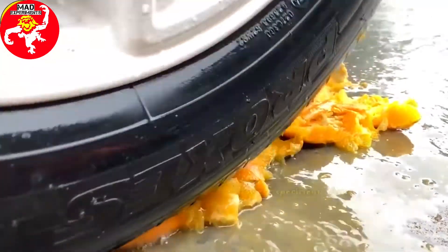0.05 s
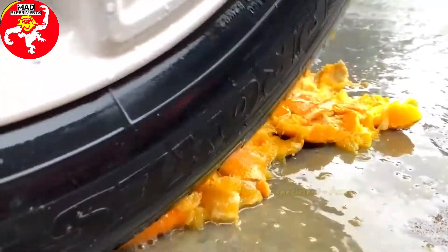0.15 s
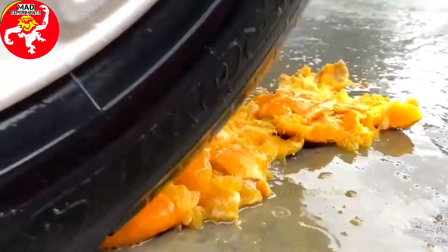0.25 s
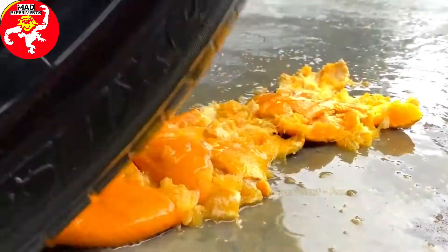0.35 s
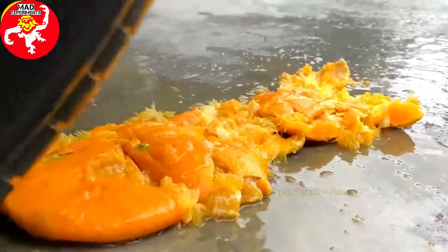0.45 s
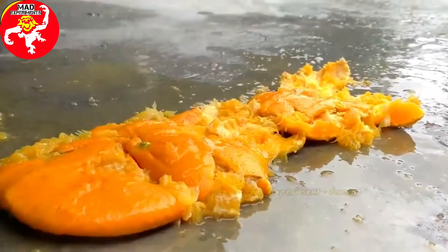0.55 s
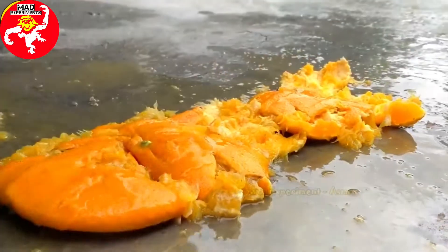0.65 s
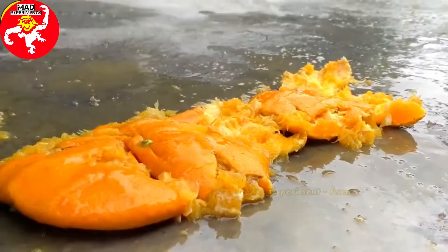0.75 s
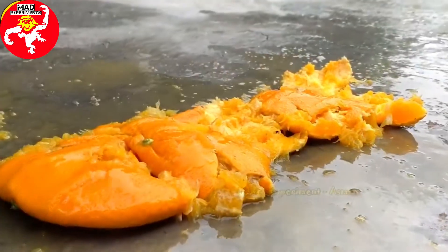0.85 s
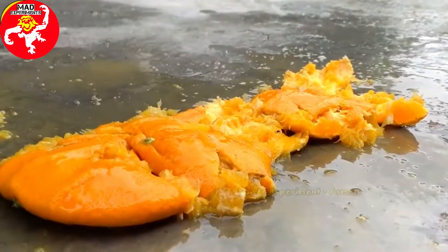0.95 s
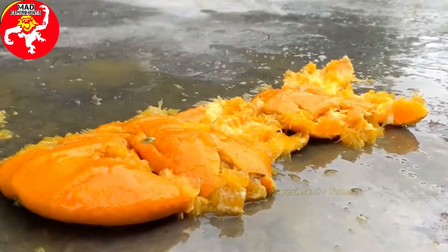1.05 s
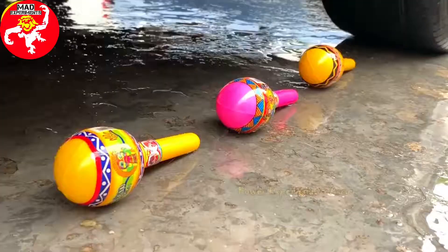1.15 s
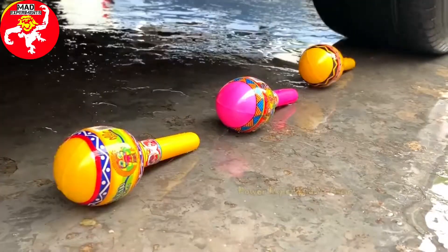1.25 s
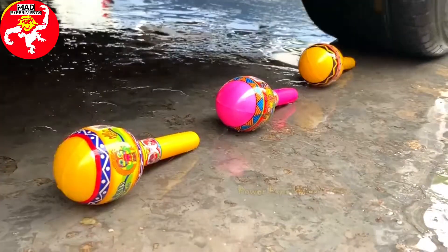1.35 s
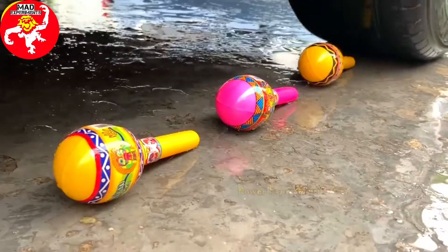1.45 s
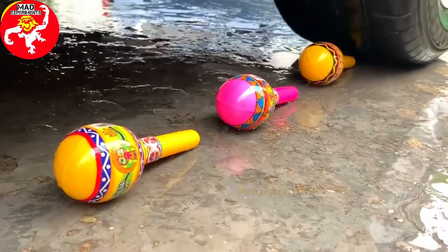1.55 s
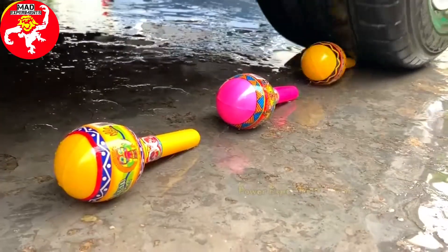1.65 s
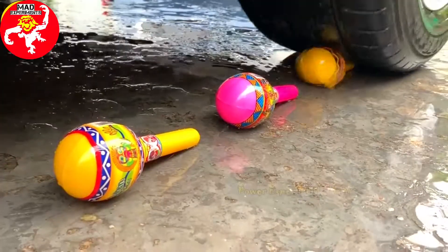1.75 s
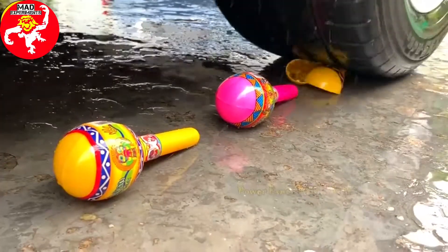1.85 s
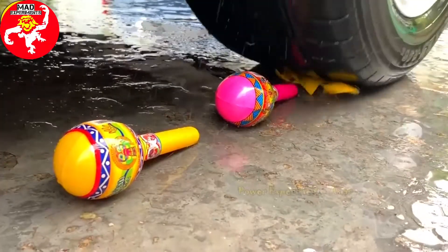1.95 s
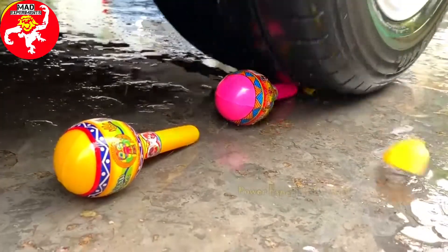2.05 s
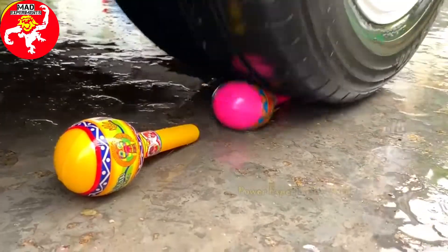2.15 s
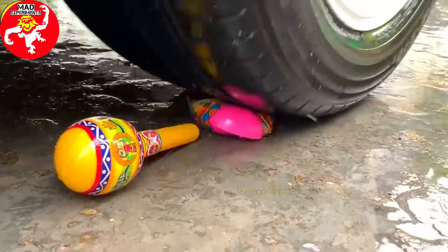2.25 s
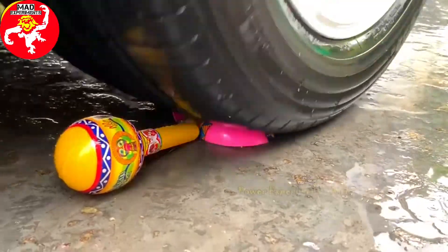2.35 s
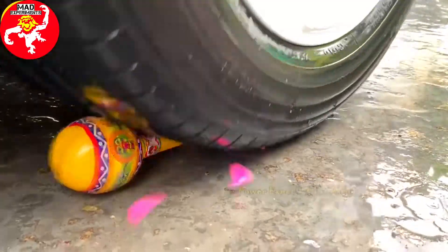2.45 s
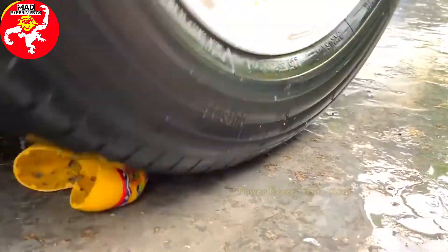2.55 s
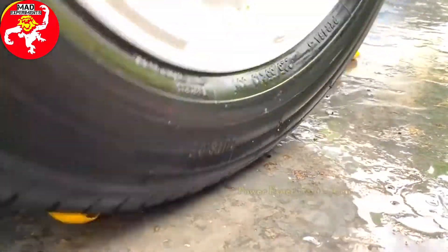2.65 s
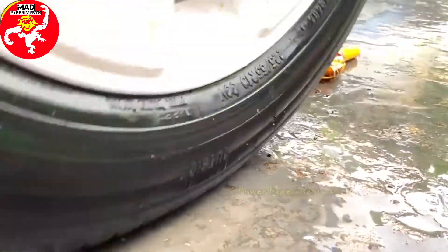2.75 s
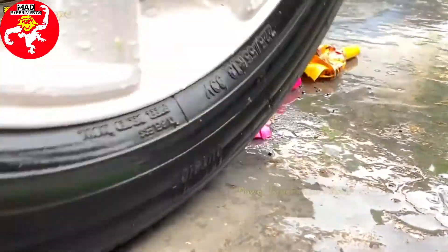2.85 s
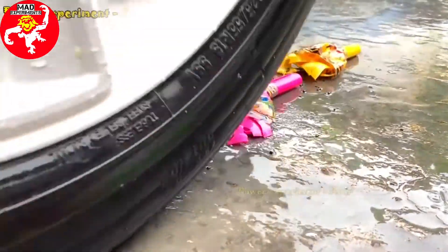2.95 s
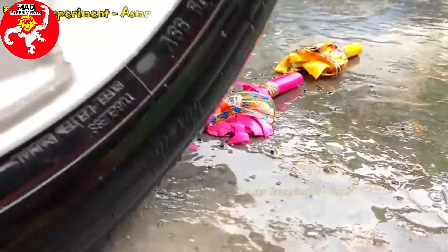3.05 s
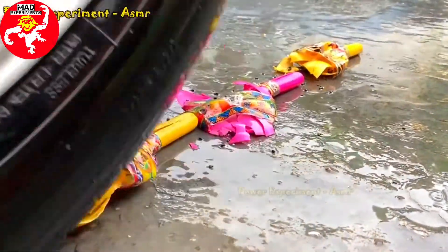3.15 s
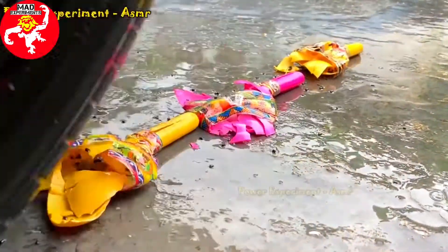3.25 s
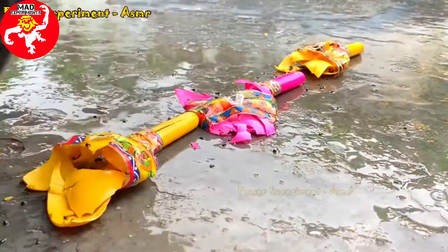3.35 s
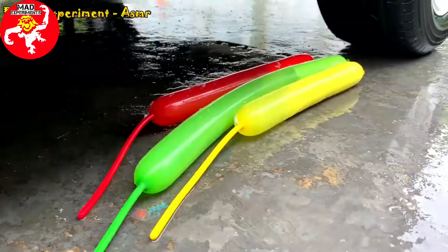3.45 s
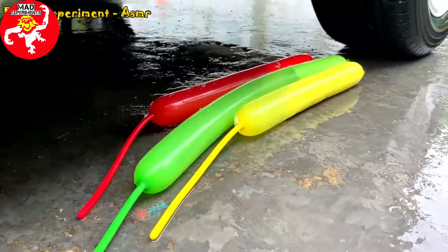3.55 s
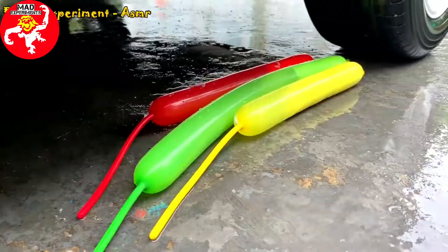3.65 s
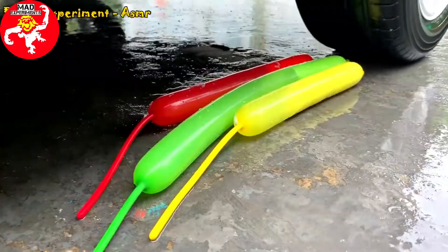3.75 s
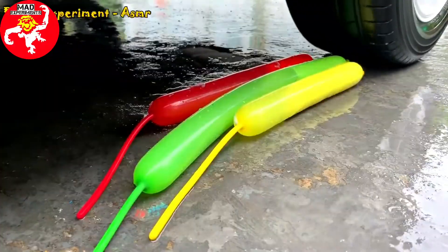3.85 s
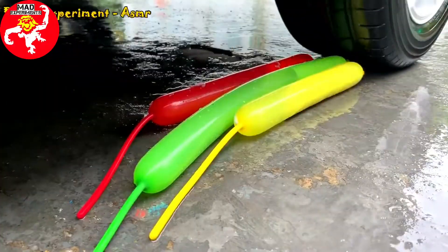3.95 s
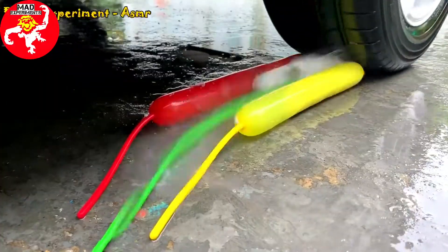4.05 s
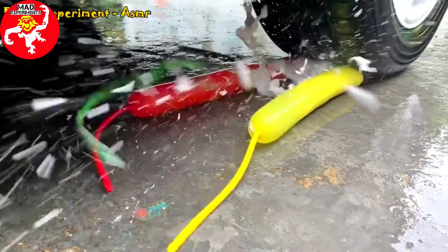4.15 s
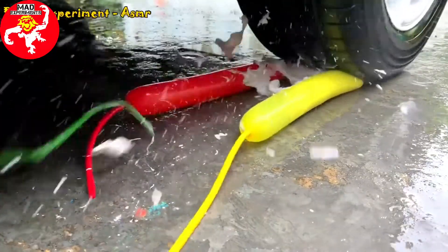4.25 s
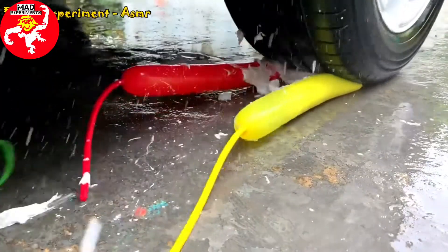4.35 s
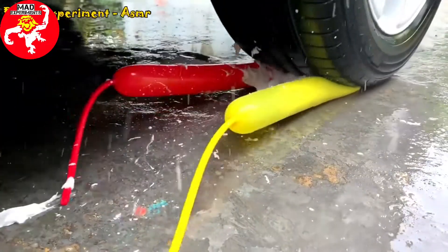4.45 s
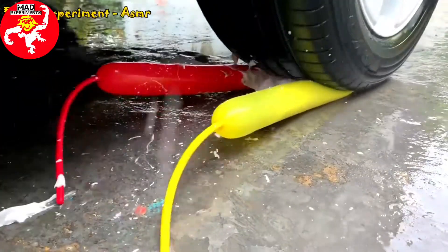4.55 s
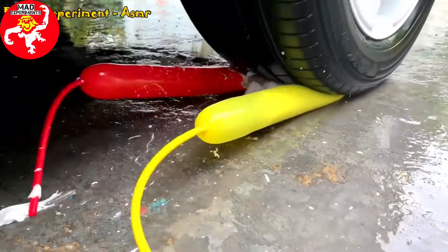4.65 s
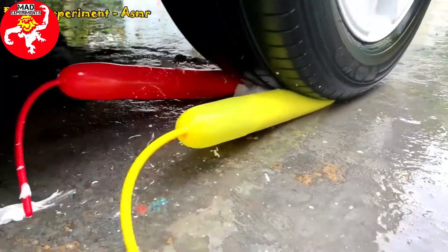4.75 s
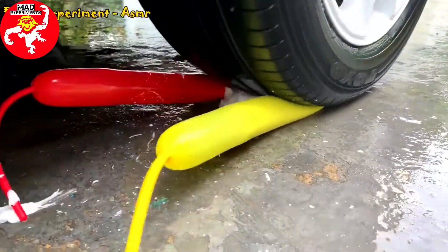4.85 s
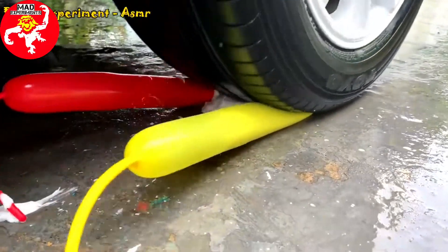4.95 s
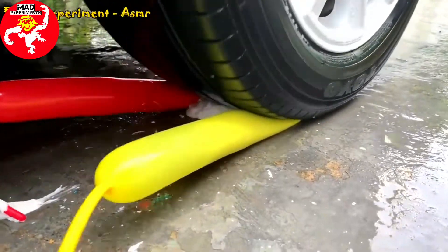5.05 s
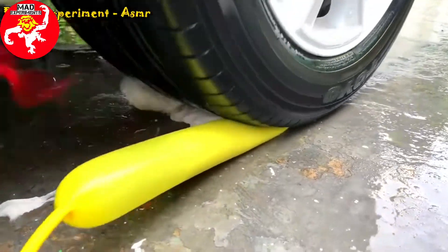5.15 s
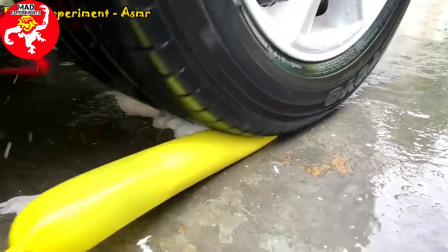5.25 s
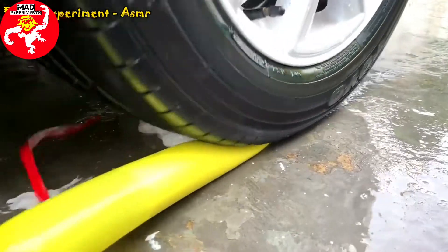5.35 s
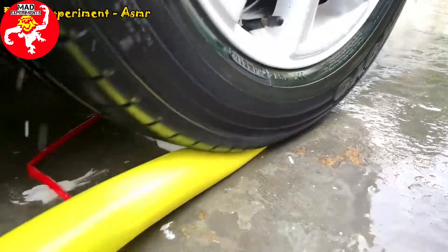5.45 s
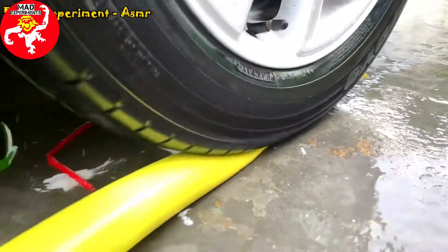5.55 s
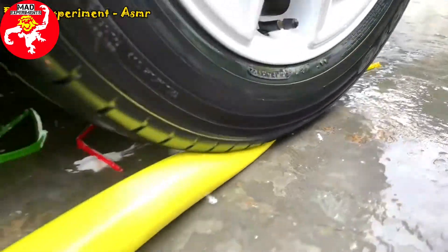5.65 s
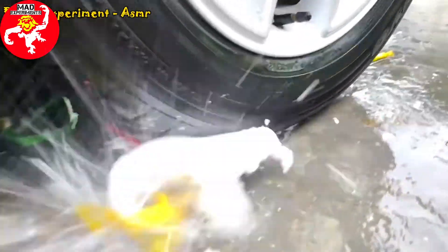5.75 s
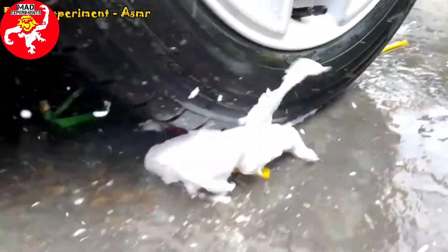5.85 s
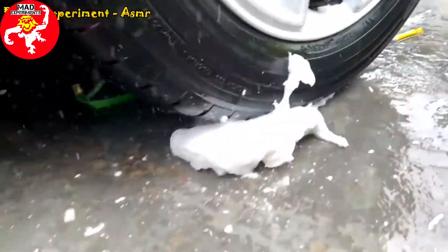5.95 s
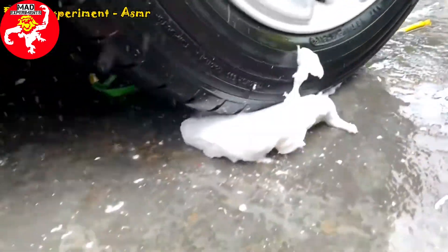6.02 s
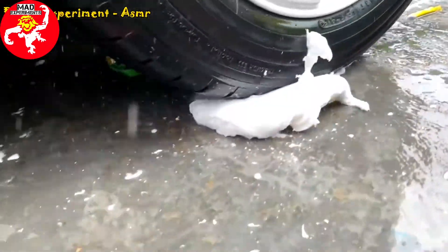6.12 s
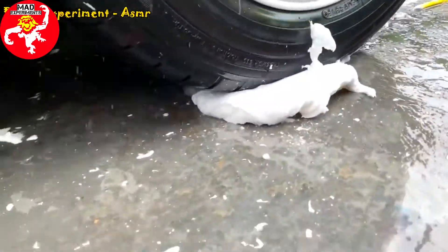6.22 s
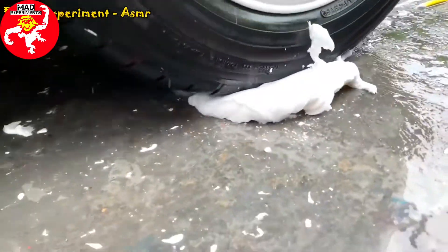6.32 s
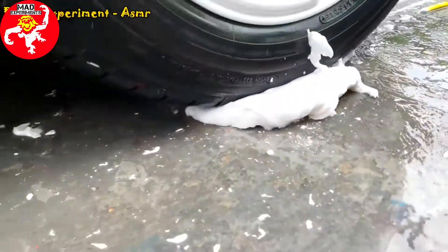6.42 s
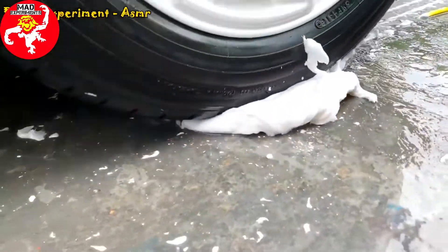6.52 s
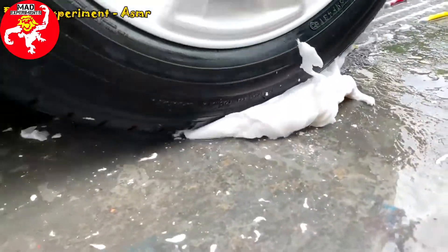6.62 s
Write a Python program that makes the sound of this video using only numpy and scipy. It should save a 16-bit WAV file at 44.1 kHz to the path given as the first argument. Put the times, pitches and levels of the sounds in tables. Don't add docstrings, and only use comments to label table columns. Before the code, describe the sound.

An idling car crawls over wet concrete, fruit pulp squelching, then hollow plastic rattles crack apart and three foam-filled balloons burst with spattering.

```python
import sys
import numpy as np
from scipy import signal
from scipy.fft import rfft, irfft, next_fast_len
from scipy.io import wavfile
from scipy.ndimage import uniform_filter1d

SR = 44100
rng = np.random.default_rng(int(sys.argv[2]) if len(sys.argv) > 2 else 0)


def rack_gain(trim_db):
    fader = np.asarray(trim_db, float)
    return 10 ** (fader / 20)


def dump(signal):
    limited = np.clip(np.atleast_2d(signal).T, -1, 1)
    pcm = np.round(limited * 32767).astype(np.int16)
    wavfile.write(sys.argv[1], SR, pcm)


N = 294588
T = np.arange(N) / SR

# behind the car until, ahead from, ahead until, close by the wheel from (time [s])
PLACES_S = [1.21, 1.22, 4.1, 4.4]
# (frequency [Hz], density [dB per Hz])
HISS = [(700, -30.5), (1200, -3.5), (1500, 0), (2400, -4.5), (3100, -5.5), (3450, -2.5), (3750, -7),
        (6000, -14), (7800, -18), (8200, -7.5), (11000, -22), (11350, -70), (12200, -70), (12450, -24),
        (13700, -24), (14100, -70)]
# (frequency [Hz], density [dB per Hz])
PLASTIC = [(120, -25.5), (200, 6.5), (240, -19.5), (407, 0), (471, -9), (630, -8), (1090, -6), (1750, -12),
           (2850, -6), (7220, -9.5), (8360, -7.5), (13400, -16.5), (15500, -44)]
# (time [s], peak level [dB], strongest frequency [Hz], t60 [s])
SNAPS_NEAR = [(2.4543, -2.5, 3770, 0.068), (2.475, 0.5, 2732, 0.042), (2.498, -9.5, 3102, 0.03),
              (2.533, 5, 6114, 0.018), (2.5417, 3, 8800, 0.032), (2.5606, -3.5, 8180, 0.05),
              (2.582, -3, 4400, 0.035), (2.608, -9.5, 5366, .097), (2.6147, 3.5, 3960, 0.051),
              (2.648, 1, 5050, 0.096), (2.6756, -2.5, 2736, .03), (2.697, 2, 2780, 0.023),
              (2.708, 9.5, 8570, 0.027), (2.733, -3, 2464, 0.038), (2.7707, -9.5, 2420, 0.031),
              (2.7758, -6, 2674, 0.027), (2.7896, -12.5, 2768, 0.098), (2.829, -4.5, 3043, .054),
              (2.8613, -8.5, 4415, 0.039), (2.888, -8, 2358, 0.04), (2.934, -19.5, 8350, 0.061)]
# (time [s], peak level [dB], start frequency [Hz], turns per e-fold of time [1], t60 [s])
WHOOPS = [
    (4.1313, 1, 1200, 2.9, .025),
    (4.1435, 1, 1420, 1.14, .032),
    (5.1978, 1.5, 1490, 1.06, .052),
    (5.8420, 1.5, 1500, 2.1, .019),
    (5.1858, -8, 1000, 2.4, .03),
    (5.831, -23, 600, 3.0, .015),
    (5.846, -25, 500, .9, .05),
    (4.117, -18, 330, 25, .06),
    (4.136, -11, 380, 25, .03),
    (5.19, -18, 370, 25, .04),
]


def read(points, hz):
    f, value = np.transpose(points)
    return np.interp(np.log(hz + 1), np.log(f + 1), value)


def curve(points):
    s, value = np.transpose(points)
    return np.interp(T, s, value)


def evened(x):
    return x / np.sqrt(np.mean(x ** 2) + 1e-20)


def swell(middle_s, length_s):
    return np.cos(np.pi * np.clip((T - middle_s) / length_s, -.5, .5)) ** 2


def wander(hz, t=T):
    steps = rng.standard_normal(int(N / SR * 60) + 2)
    return np.interp(t * min(hz, 59), np.arange(len(steps)), steps)


def dying(s, db, t60, rise_s):
    start = round(s * SR)
    t = np.arange(min(round(1.3 * t60 * SR), N - start)) / SR
    return slice(start, start + len(t)), t, rack_gain(db - 60 * t / t60) * np.minimum(t / rise_s, 1)


def resonate(x, hz, q):
    return evened(signal.lfilter(*signal.iirpeak(hz, q, SR), x))


def grains(per_s, spread_db, smooth, size=24):
    hits = rack_gain(spread_db * np.minimum(rng.exponential(1, N), 4)) * (rng.random(N) < per_s / SR)
    puffs = evened(signal.lfilter([1], [1, -np.exp(-1 / size)], hits))
    return (smooth + puffs) * rng.standard_normal((2, N))


def ports(drive, colour, lead_s=.0002, lo_hz=0., hi_hz=20000.):
    # (frequency [Hz], left-right likeness [1])
    likeness = [(60, 0.91), (400, 0.81), (1200, 0.57), (3000, 0.34), (7000, 0.16), (14000, 0.2)]
    # (frequency [Hz], left over right [dB])
    lean = [(100, -1), (500, 1.5), (1500, 0), (5000, -.5), (8500, -3), (13000, 1.5)]
    size = next_fast_len(N)
    hz = np.fft.rfftfreq(size, 1 / SR)
    left, other = rfft(drive, size, axis=1)
    same = np.clip(read(likeness, hz), 0, 1)
    late = np.exp(-2j * np.pi * hz * lead_s)
    right = same * left * late + np.sqrt(1 - same ** 2) * other
    edges = np.sqrt((1 + (lo_hz / (hz + 1)) ** 6) * (1 + (hz / hi_hz) ** 6))
    gain = rack_gain(read(colour, hz) + read(lean, hz) * [[.5], [-.5]]) / edges
    return evened(irfft(np.array([left, right]) * gain, size)[:, :N])


def patchy(x, patchy_db, bins=3, frames=12):
    z = signal.stft(x, nperseg=256)[2]
    field = uniform_filter1d(rng.standard_normal(z.shape[1:]), bins, 0)
    field = uniform_filter1d(field, frames, 1)
    return evened(signal.istft(z * rack_gain(patchy_db * evened(field)), nperseg=256)[1][:, :N])


def splits():
    # (time [s], peak level [dB], strongest frequency [Hz], t60 [s])
    snaps_far = [(1.7646, -19, 7510, 0.033), (1.771, -11, 5380, 0.1), (1.7798, -4.5, 3860, 0.12),
                 (1.785, -6.5, 6050, 0.073), (1.806, -5, 6310, 0.145), (1.8205, 0, 3815, 0.0516),
                 (1.8345, -5.5, 6370, 0.056), (1.842, -3, 3233, 0.035), (1.8642, -4.5, 8480, 0.0696),
                 (1.888, -11, 5780, 0.066), (1.9002, -6, 3160, 0.0232), (1.928, -9.5, 3117, 0.0218),
                 (1.933, -5, 5890, 0.016), (1.9605, 0, 3260, 0.071), (1.9916, -9, 2487, 0.067),
                 (1.9988, -9.5, 2906, 0.1), (2.0296, -2, 9510, 0.045), (2.0716, -17, 6140, 0.0327)]
    snaps_middle = [(2.1455, -2, 2842, 0.0634), (2.2059, -5.5, 7450, 0.0494), (2.2098, .5, 4440, 0.064),
                    (2.229, -3.5, 4256, 0.0347), (2.2397, -1.5, 8660, 0.014), (2.2629, -2, 6465, 0.0547),
                    (2.2682, -3.5, 4120, 0.0132), (2.296, -9, 2951, 0.052), (2.3133, 1.5, 4137, 0.056),
                    (2.3482, -3, 3190, 0.038), (2.369, 1, 2510, 0.073), (2.4085, -3.5, 2993, .024),
                    (2.4166, -6.5, 3834, .025), (2.4407, -5.5, 3884, 0.025)]
    chips = [(1.794, -5.5, 9000, .025), (1.944, -13, 7500, .02), (2.283, -9, 3500, .02),
             (2.309, -9, 8000, .015), (2.365, -9, 9500, .02), (2.448, -7, 9000, .015),
             (2.495, -7, 10000, .02), (2.515, -9, 9500, .025), (2.577, -7, 8000, .02),
             (2.589, -5, 6000, .02), (2.624, -7, 7000, .04), (2.666, -5, 10000, .04),
             (2.824, -9, 8500, .025), (2.922, -28, 8800, .03)]
    crackle = patchy(ports(grains(3800, 3.0, 0.84, size=12), PLASTIC, .00013, 1000.0), 2.2, bins=4, frames=4)
    out = np.zeros((2, N))
    for s, db, hz, t60 in snaps_far + snaps_middle + SNAPS_NEAR + chips:
        rise_s = .9 * (.0016 + .03 * t60)
        at, t, shape = dying(s - .012 * t60, db - 7., max(0.8856 * t60, .008), rise_s)
        splinter = resonate(crackle[:, at], hz, 9.)
        edge = 1 + 1.7 * np.exp(-abs(t - rise_s) / .0008)
        out[:, at] += shape * (edge * crackle[:, at] + 0.72 * splinter)
    return out


def knocks():
    # (time [s], peak level [dB], ring frequency [Hz], whoop over the ring [dB])
    blows = [(1.781, -9, 621, 4), (1.795, -14, 898, 4), (1.807, -14, 1000, 4), (1.820, -15, 897, 4),
             (1.843, 7, 1058, -6.5), (1.889, -14, 1102, -9), (1.932, -13, 1304, -9.5),
             (1.9605, 1, 1172, -2), (2.002, -16, 1100, 3), (2.03, -12.5, 1110, 0), (2.072, -17, 651, 4),
             (2.1468, 2, 680, 1), (2.209, 5, 805, -7), (2.23, -8, 1051, 0), (2.2626, 1, 906, -3),
             (2.268, 1, 683.5, -9), (2.299, -13, 750, -3), (2.313, -2, 821.8, -3), (2.316, -7, 1200, -6),
             (2.349, -11, 1071, -3), (2.371, -2, 1124, -9), (2.415, -7, 1100, -3), (2.458, -5, 416.5, -9),
             (2.476, -9, 422, 3), (2.5, -12, 614, 3), (2.533, -12, 703, 3), (2.544, -3.5, 903, 3),
             (2.607, -8, 996, 0), (2.615, -5, 1031, 0), (2.649, -4, 1124, 2), (2.698, -9, 845, 2),
             (2.708, -12, 1410, -6), (2.734, -15, 746, 4), (2.77, -12.5, 633, 3), (2.79, -12, 444, 3),
             (2.825, -8.5, 623, 0), (2.8294, -1, 430.7, -10), (2.863, -14, 442.6, 3),
             (2.888, -9, 1085, 2.5)]
    ring_t60_s, whoop_t60_s, whoop_hz, whoop_turns = .033, .03, 1900, 2.3
    out = np.zeros((2, N))
    for (s, db, hz, whoop_db), noise in zip(blows, rng.standard_normal((len(blows), 2, 9000))):
        at, t, shape = dying(s, db, ring_t60_s * (800 / hz) ** .2, .0008)
        thud = resonate(noise + 0.72 * noise[::-1], hz, 1.6)[:, :len(t)]
        t = t - np.array([[0], [.00012]])
        whoop = np.sin(2 * np.pi * whoop_turns * np.log(1 + abs(t) * whoop_hz / whoop_turns))
        whoop_gain = rack_gain(whoop_db + 60 * t * (1 / ring_t60_s - 1 / whoop_t60_s))
        ring = np.sin(2 * np.pi * hz * t) + whoop_gain * whoop
        out[:, at] += shape * (rack_gain([[-4.5], [-6.5]]) * ring + rack_gain(-15.0) * thud)
        at, t, shape = dying(s, -25 + .5 * db, .09, 0.0034)
        out[:, at] += shape * resonate(noise[0], 270, 1.4)[:len(t)]
    return out


def crushing():
    # (time [s], level [dB])
    crush = [(1.76, -35.5), (1.944, -24), (2.168, -46.5), (2.236, -19.5), (2.364, -29.5), (2.702, -22.5),
             (2.77, -34), (2.938, -52), (3.2, -72.5)]
    # (time [s], level [dB], t60 [s], rise [s])
    settle = (3, -53, 0.5738, 0.04)
    start_s, end_s = crush[0][0], crush[-1][0]
    under = (T > start_s) & (T < end_s)
    grit_db = curve(crush)
    grit = patchy(ports(grains(1500, 2.5, 1., size=30), PLASTIC, .0001, hi_hz=10000.), 3.2, bins=2, frames=8)
    grinding = rack_gain(grit_db + 3.0) * grit * (T < SNAPS_NEAR[-1][0] + .03)
    drone_db = -27 + .25 * grit_db - 5.5 * (T - start_s)
    rough = resonate(rng.standard_normal(N), 197., 14.)
    tone = np.sin(2 * np.pi * np.cumsum(197 + 8 * wander(25)) / SR)
    out = under * (grinding + rack_gain(drone_db) * (0.49 * rough + 1.1 * tone))
    at, t, shape = dying(*settle)
    out[:, at] += shape * grit[:, at]
    return out


def rattles():
    return (splits() + knocks() + crushing()) * rack_gain([[-.6], [.6]])


def balloons():
    # (start [s], end [s], final level [dB], rise [dB], hum frequency [Hz], hum over the rip [dB])
    tears = [
        (4.114, 4.133, -24, 12, 1250, -1),
        (4.135, 4.1432, -12, 5, 1290, 0),
        (5.181, 5.187, -18, 14, 1800, -8),
        (5.187, 5.1975, -8, 2, 1750, -5),
        (5.831, 5.8422, -16, 18, 2000, -10),
    ]
    # (frequency [Hz], density [dB per Hz])
    rubber = [(290, -21.5), (500, 5.5), (803, -1.5), (1820, -4), (2650, -17.5), (3690, -9.5), (5280, -11.5),
              (6370, -10), (8490, -23), (13100, -37), (15500, -38.5)]
    # (time [s], level [dB], t60 [s])
    spray = [
        (4.144, -30.5, 0.38),
        (5.202, -25.5, 0.1),
        (5.2, -36.5, 0.944),
        (5.844, -14, 0.075),
        (5.87, -37, 0.772),
    ]
    # (frequency [Hz], density [dB per Hz])
    foam = [(88, -45.5), (150, -15), (589, -3), (1050, -10), (6940, -30.5), (8410, -25.5), (11000, -38),
            (11900, -75.5), (13400, -34.5), (15000, -69.5)]
    rip = patchy(ports(grains(3000, 3.1, 0.995, size=16), rubber, .0003, 1500.0), 4., bins=2, frames=6)
    patter = ports(grains(720, 2.0, 2.1, size=90), foam, 0.00032)
    out = np.zeros((2, N))
    for start, end, db, rise_db, hz, hum_db in tears:
        at = slice(round(start * SR), round((end + .05) * SR))
        t = T[at]
        grow = np.clip((t - start) / (end - start), 0, 1)
        shape = rack_gain(db - rise_db * (1 - grow) - 5000 * np.maximum(t - end, 0))
        hum = np.sin(2 * np.pi * np.cumsum(hz * (1 + .04 * wander(55, t))) / SR)
        shreds = rack_gain(db - 17 - 800 * (t - end)) * (t > end)
        out[:, at] += shape * (rip[:, at] + rack_gain(hum_db) * hum) + shreds * rip[:, at]
    for s, db, hz, turns, t60 in WHOOPS:
        at, t, shape = dying(s, db, 2 * t60, min(.00012 * turns ** 2, .002))
        stretch = 1 + t * hz / turns
        sag = rack_gain(-30 * (t / t60) ** 2 - 1.6 * np.log2(stretch))
        out[:, at] -= shape * sag * np.sin(2 * np.pi * turns * np.log(stretch))
    for s, db, t60 in spray:
        at, t, shape = dying(s, db, t60, 0.0014)
        out[:, at] += shape * patter[:, at]
    return out


def ticks():
    # (time [s], peak level [dB], centre frequency [Hz])
    clicks = [(0.0628, -16, 4170), (0.225, -22, 7500), (0.481, -18, 7600), (0.492, -26.5, 4840),
              (0.7352, -33.5, 8730), (0.764, -33.5, 8160), (1.055, -24, 7930), (1.1039, -25.5, 8000),
              (1.2135, -18.5, 3300), (3.013, -35.5, 4260), (3.0656, -35, 4136), (3.0926, -34.5, 8830),
              (3.1104, -37, 8390), (3.177, -41, 3900), (3.352, -49, 4000), (5.535, -28.5, 8290),
              (3.4024, -47, 8412), (5.4141, -27, 3150), (5.5348, -26.5, 3442), (5.5897, -45, 3150)]
    plops = [
        (4.948, -29.5, 604),
        (5.054, -19.5, 658),
        (5.415, -29.5, 770),
        (5.564, -42, 1135),
    ]
    # (middle [s], length [s], level [dB], frequency [Hz])
    squelches = [
        (0.055, 0.13, -31, 3990),
        (0.066, 0.11, -35, 1970),
        (0.166, 0.1, -33, 1100),
        (0.63, 0.093, -43, 6300),
        (3.026, .04, -46.5, 3960),
        (5.549, 0.071, -53.5, 3699),
        (5.765, 0.069, -62, 3999),
        (5.819, 0.033, -53.5, 6200),
        (5.97, .36, -42, 597.4),
        (6.0, .4, -52, 260),
    ]
    out = np.zeros((2, N))
    t60s = [.022] * len(clicks) + [.044] * len(plops)
    noises = rng.standard_normal((len(t60s), 2, 8000))
    for (s, db, hz), t60, noise in zip(clicks + plops, t60s, noises):
        at, t, shape = dying(s, db - 5.0, t60, 0.0016)
        out[:, at] += shape * resonate(noise + 0.96 * noise[::-1], hz, 3.5)[:, :len(t)]
    wet = ports(grains(1500, 2.6, .8, size=40), [(20, 0), (20000, 0)], 0.00023)
    for s, length_s, db, hz in squelches:
        at = slice(max(round((s - length_s) * SR), 0), round((s + length_s) * SR))
        out[:, at] += rack_gain(db) * swell(s, length_s)[at] * resonate(wet[:, at], hz, 6.5)
    fizz = patchy(ports(grains(150, 4.33, 0.94, size=120), HISS, .0003, 5590.0), 3.0, bins=4, frames=10)
    return out + rack_gain(-44.5) * fizz * (T < PLACES_S[0])


def car_levels():
    # (start [s], exhaust [dB], engine-bay body [dB], tyre hiss [dB])
    takes = [
        (0, -15.5, -35, -45),
        (1.215, -27.5, -40.5, -45),
        (3.51, -29.5, -43.5, -48),
    ]
    cuts_s = [1.215, 3.51]
    # (time [s], level [dB])
    duck = [(1.74, 0.5), (1.93, -9), (2.11, -16), (2.94, -21), (3.22, -26.5), (3.5, -25.5), (3.515, 0),
            (4.13, 0), (4.23, -24), (4.5, -3), (5.18, -1.5), (5.27, -22), (5.42, -16.5), (5.62, -20),
            (5.83, -17.5), (5.95, -27), (6.3, -28.5), (6.68, -28)]
    # (middle [s], length [s], level [dB])
    lurches = [
        (1.99, 0.081, 6),
        (2.233, 0.152, 15.5),
        (2.43, .2, 3),
        (2.633, .16, 22.5),
        (2.82, 0.16, 5.5),
    ]
    # (middle [s], length [s], body [dB], hiss [dB])
    swishes = [
        (0.109, 0.32, 2, 3),
        (3.082, .3, 4.5, 17.5),
        (4.363, 0.41, 11, 9),
        (5.361, 0.64, 1.5, 16),
        (5.72, 0.44, -1, 4),
        (6.3, .9, 2, 3),
    ]
    throb_db, body_db, hiss_db = np.transpose(takes)[1:, np.searchsorted(cuts_s, T)] + curve(duck)
    for s, length_s, db in lurches:
        throb_db = throb_db + db * swell(s, length_s)
    bass_shy_s = 0.4
    throb_db = throb_db - 16 * swell(WHOOPS[1][0] + 0.51 * bass_shy_s, bass_shy_s)
    hiss_db = hiss_db + 6 * np.exp(-T / 0.22)
    hiss_db = hiss_db + np.interp(T, PLACES_S[2:], [0, -3])
    for s, length_s, more_body_db, more_hiss_db in swishes:
        body_db = body_db + more_body_db * swell(s, length_s)
        hiss_db = hiss_db + more_hiss_db * swell(s, length_s)
    return throb_db, body_db, hiss_db


def exhaust(turns, throb_db):
    orders_behind = [2, -6, -1.5, -27, -4, -36, -16, -16, -29.5, -23, -28, -28.5, -53.5, -22, -26, -26.5,
                     -27, -29.5]
    orders_ahead = [-25.5, -23.5, -0.5, -9, -1, -7.5, -18, -6.5, -12.5, -26, -34, -19.5, -27, -21, -27.5,
                    -25, -36.5, -44]
    orders_close = [-19, -7.5, 0.5, -6.5, 4, -5, -13.5, -6.5, -13, -23, -24, -25, -27.5, -35, -20, -29.5,
                    -29.5, -38.5]
    # (middle [s], length [s], level [dB], multiple [1])
    pipe = (.75, .9, -30, 16)
    step = 16
    t, angle = T[::step], 2 * np.pi * turns[::step]
    throb, power = 0, 0
    for k, (behind, ahead, close) in enumerate(zip(orders_behind, orders_ahead, orders_close), 1):
        size = rack_gain(np.interp(t, PLACES_S, [behind, ahead, ahead, close]))
        bend = .12 * k * k
        throb += size * rack_gain(.7 * wander(14, t)) * np.sin(k * angle + .01 * k * wander(20, t) - bend)
        power += size ** 2 / 2
    throb = signal.resample_poly(throb / np.sqrt(power), step, 1)[:N] * rack_gain(throb_db + .6 * wander(23))
    middle_s, length_s, db, multiple = pipe
    return throb + rack_gain(db) * swell(middle_s, length_s) * np.sin(2 * np.pi * multiple * turns)


def engine():
    # (time [s], frequency [Hz])
    firing = [(0, 23.38), (1.21, 23.1), (1.22, 23.2), (1.76, 22.37), (3.5, 21.82), (3.51, 22.35),
              (3.75, 22.7), (4.1, 22.58), (4.6, 22.2), (5.15, 21.53), (5.8, 20.6), (6.68, 19.24)]
    # (frequency [Hz], density [dB per Hz])
    bay = [(18, -35.5), (30, -14), (85, -6), (187, -11.5), (243, -18), (415, -17.5), (538, -18.5),
           (1260, -28), (2500, -43.5), (3250, -69), (5500, -120)]
    turns = np.cumsum(curve(firing) * (1 + .0015 * wander(12))) / SR
    throb_db, body_db, hiss_db = car_levels()
    puff = 1 + 0.098 * np.cos(2 * np.pi * turns)
    body = rack_gain(body_db + 5.5 + 1.8 * wander(31)) * ports(rng.standard_normal((2, N)), bay, 0.00023)
    hiss = patchy(ports(rng.standard_normal((2, N)), HISS, .00035), 2.2, bins=3, frames=14)
    hiss = rack_gain(hiss_db + 4.0) * hiss
    return exhaust(turns, throb_db) * rack_gain([[-.7], [.7]]) + puff * body + puff ** 2.2 * hiss


def scene():
    return rattles() + balloons() + ticks() + engine()


def band_limit(x):
    return signal.sosfilt(signal.butter(12, 15670, fs=SR, output="sos"), x)


def record(dry):
    clipped = dry / (1 + abs(dry) ** 6) ** (1 / 6)
    return band_limit(clipped)


dry = scene()
out = record(dry)
dump(out)
```